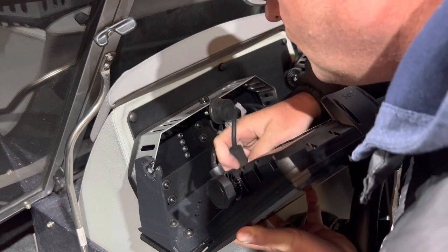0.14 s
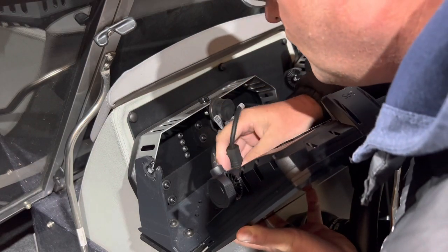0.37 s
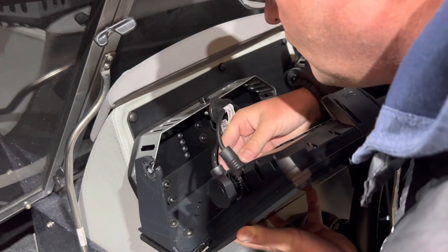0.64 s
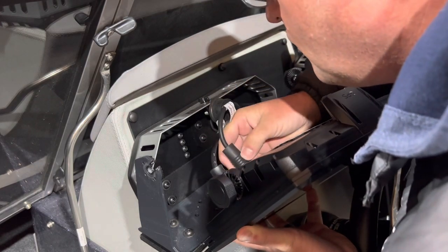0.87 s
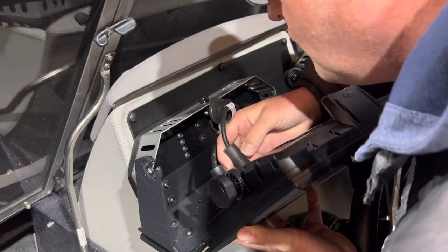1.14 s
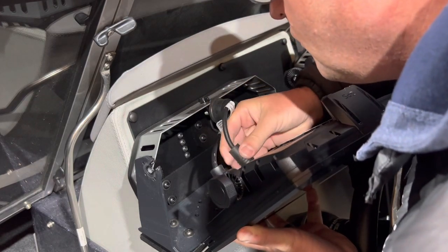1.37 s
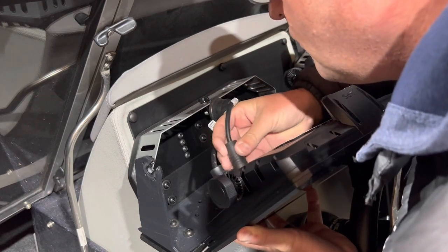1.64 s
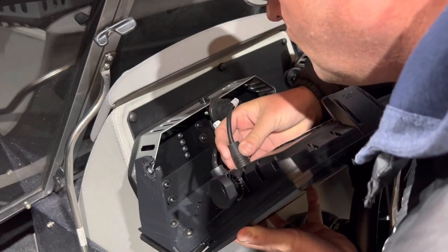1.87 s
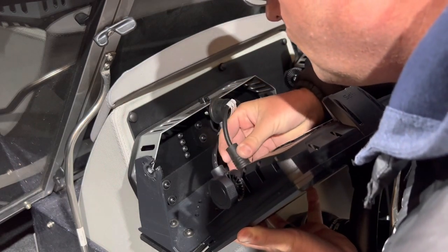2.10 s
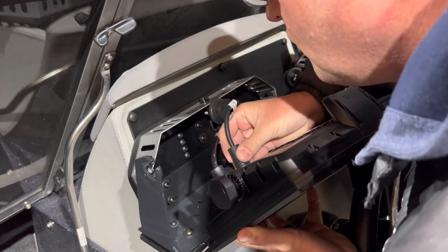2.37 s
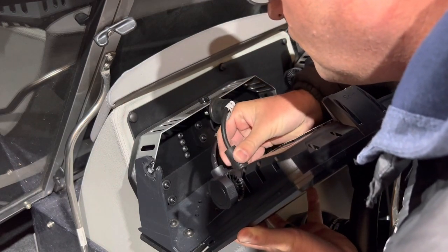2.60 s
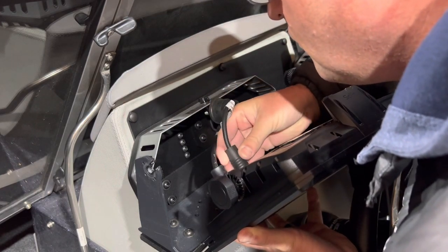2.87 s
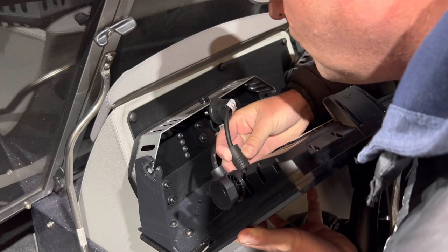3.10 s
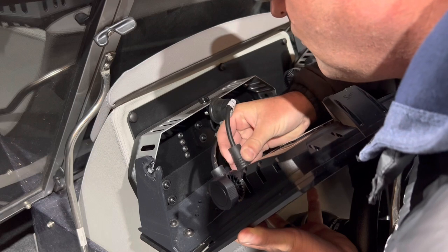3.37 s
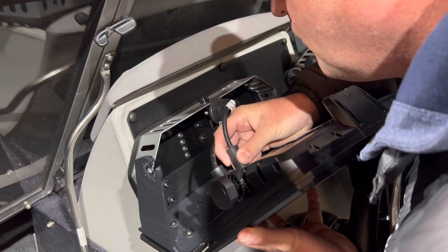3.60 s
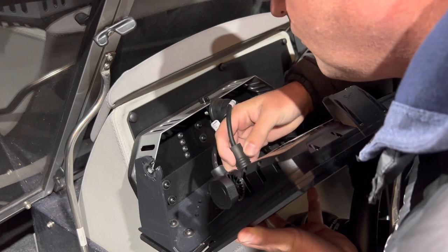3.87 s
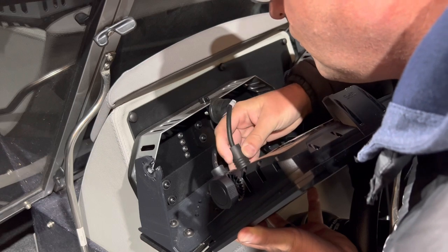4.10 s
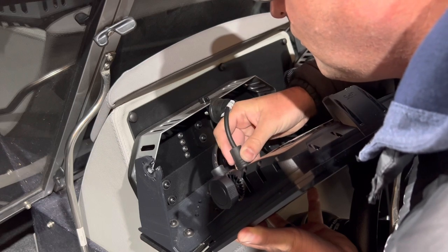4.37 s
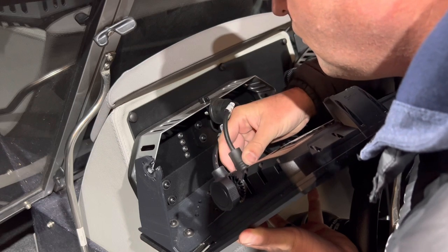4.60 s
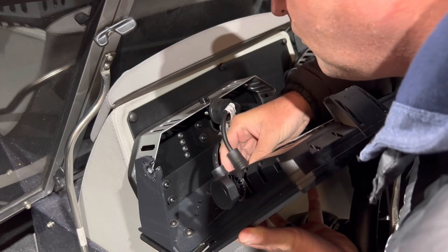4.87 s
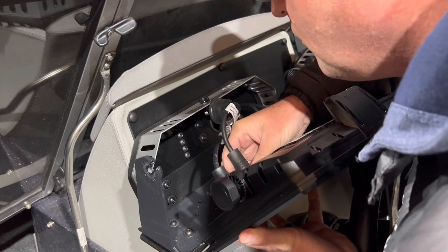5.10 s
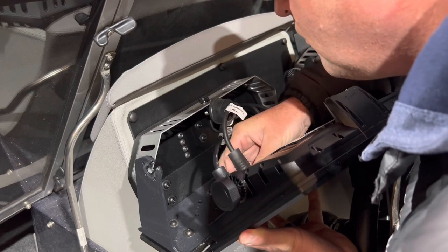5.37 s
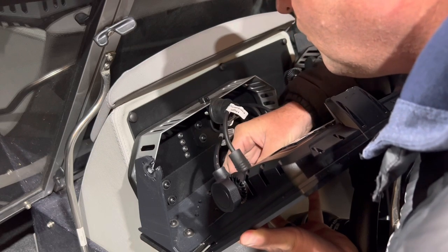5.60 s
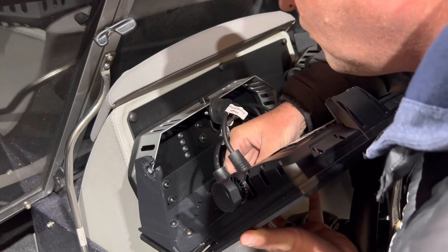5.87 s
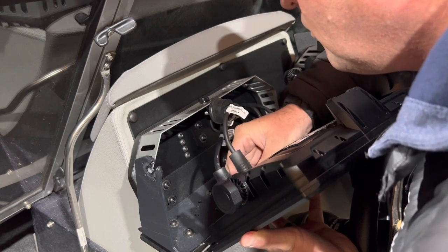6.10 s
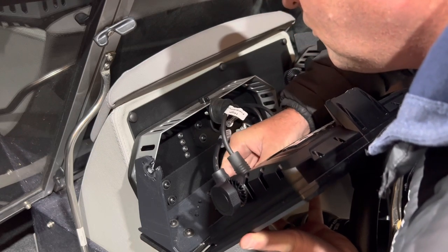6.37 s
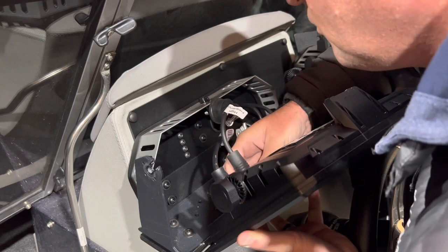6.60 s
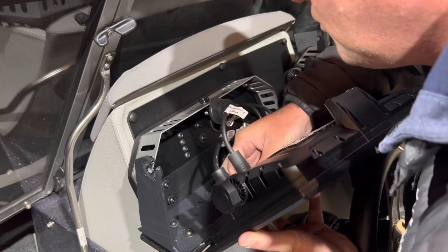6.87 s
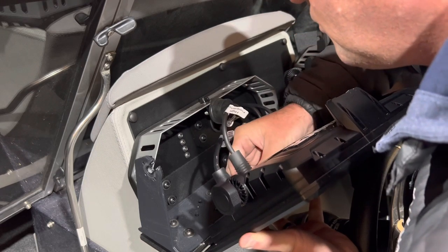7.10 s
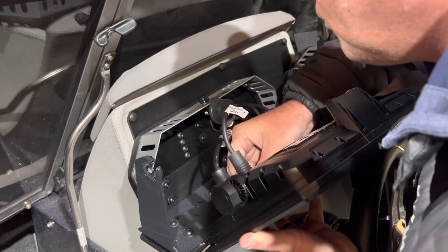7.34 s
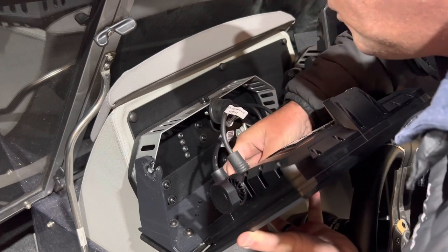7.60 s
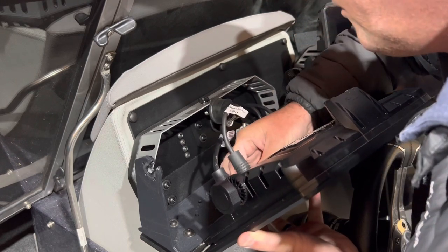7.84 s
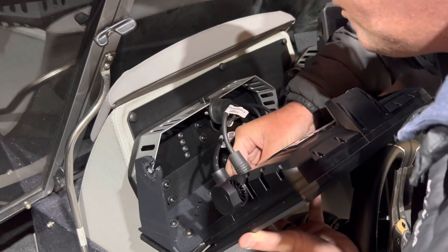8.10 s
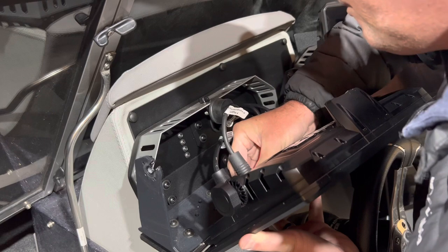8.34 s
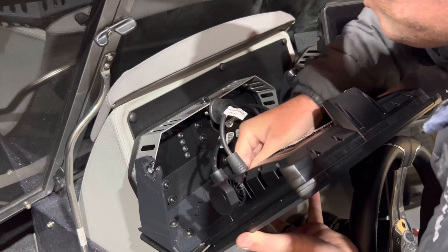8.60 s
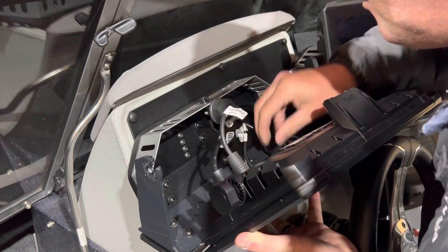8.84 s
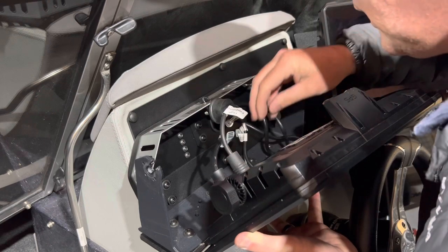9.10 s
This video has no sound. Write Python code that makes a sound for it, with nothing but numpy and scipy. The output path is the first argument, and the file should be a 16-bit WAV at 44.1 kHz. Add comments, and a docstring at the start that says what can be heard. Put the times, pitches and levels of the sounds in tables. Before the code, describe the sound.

In a small cabin, hands work connectors into the back of an equipment case. Over a faint low hum come handling rumble, cable rubs, crisp latch ticks and hollow plastic knocks, busiest in the first couple of seconds. The middle becomes sparser and softer, mostly rustle, until a loud snap and deep thud as the last plug seats. Close stereo microphone, dry with a short room tail.

```python
"""A low room hum and the rumble and rustle of restless hands run throughout: hands push connectors into
the back of an equipment case in a small cabin, close to a two-port microphone. Filtered noise makes the hum,
sleeves and cables; slips of the grip excite case modes. Latches tick as noise cracks with a brief ring, plugs
knock the case into modal ringing and clatter, and pushed panels boom as decaying sines. Near the end the last
plug seats with a thud of several panels. Knocks and ticks get a short diffuse tail."""
import sys
import numpy as np
from scipy import signal
from scipy.fft import rfft, irfft
from scipy.io import wavfile
from scipy.ndimage import uniform_filter1d

SR = 44100
rng = np.random.default_rng(int(sys.argv[2]) if len(sys.argv) > 2 else 0)


def gain_from_decibels(decibels):
    """Convert decibel values to linear amplitude factors."""
    exponent = np.asarray(decibels, float) / 20
    return 10 ** exponent


def master(y):
    """Save y as 16-bit WAV."""
    cut = np.clip(np.atleast_2d(y).T, -1, 1)
    pcm = np.round(cut * 32767)  # scale
    wavfile.write(sys.argv[1], SR, pcm.astype(np.int16))


N = 406592  # length [samples]

# the strongest modes of the case: (frequency [Hz], relative level [dB], t60 [s])
CASE_MODES = [(219.8, 8, 0.074), (317.7, 6.5, 0.046), (465, -1, 0.058), (554, -6, 0.017),
              (722, -2.5, 0.069), (1066, -5.5, 0.072), (1640, 6.5, 0.019), (2620, -4, 0.024)]


def evened(x):
    """Normalization: scales to rms 1."""
    return x / np.sqrt(np.mean(x ** 2) + 1e-20)


def read(points, hz):
    """Interpolates a table linearly along log frequency."""
    f, value = np.transpose(points)
    return np.interp(np.log(hz + 1), np.log(f + 1), value)


def add(mix, s, sound):
    """Superposition: adds a sound to the mix at time s [s], cut off at the end."""
    part = mix[..., round(s * SR):][..., :sound.shape[-1]]
    part += sound[..., :part.shape[-1]]


def colour(x, spectrum):
    """Linear filtering: weights the spectrum along the last axis by a (frequency [Hz], gain [dB]) table."""
    hz = np.fft.rfftfreq(x.shape[-1], 1 / SR)
    return irfft(rfft(x) * gain_from_decibels(read(spectrum, hz)), x.shape[-1])


def diffuse(grain_db, per_s):
    """Partial coherence: two partly alike noises, roughened by tiny random slips that decay exponentially."""
    # diffuse sound: (frequency [Hz], left-right likeness [0 to 1])
    likeness = [(150, 0.96), (1000, 0.72), (4000, 0.54), (10000, 0.92)]
    a, b = rfft(rng.standard_normal((2, N)))
    same = np.clip(read(likeness, np.fft.rfftfreq(N, 1 / SR)), 0, 1)
    pair = irfft(np.array([a, same * a + np.sqrt(1 - same ** 2) * b]), N)
    slip_size = gain_from_decibels(grain_db * np.minimum(rng.exponential(1, N), 4))
    slips = slip_size * (rng.random(N) < per_s / SR)
    decay_s = 0.005
    roughness = signal.lfilter([1], [1, -np.exp(-1 / (decay_s * SR))], slips)
    return pair * (0.5 + roughness)


def hum():
    """Stationary noise: the room hum is diffuse noise with a mostly low spectrum."""
    # room hum: (frequency [Hz], relative level per Hz [dB])
    hum_spectrum = [(25, -2.5), (60, 2.5), (220, -13.5), (800, -32.5), (1450, -31.5), (1900, -25),
                    (2450, -38.5), (5900, -47.5), (6900, -40), (7450, -35.5), (8100, -45.5), (13200, -42),
                    (16400, -48)]
    rms_db = -59
    return gain_from_decibels(rms_db) * evened(colour(diffuse(0, 0), hum_spectrum))


def hands():
    """Amplitude modulation: gains of rumble, rub and hiss over time, from the restless hands."""
    # handling levels: (time [s], rumble through the case [dB], dull rub [dB], bright hiss [dB])
    hand_levels = [(0.0, -48.5, -71, -66), (0.25, -68, -88, -64.5), (0.7, -56, -76.5, -75.5),
                   (1.25, -51.5, -62.5, -69), (1.6, -67, -74.5, -69), (1.85, -54, -62, -69.5),
                   (2.1, -65, -78, -79), (2.5, -61.5, -71, -76.5), (2.95, -62.5, -74.5, -89),
                   (3.4, -65.5, -67, -70.5), (3.7, -63, -99, -79), (4.1, -74.5, -81, -91),
                   (4.45, -57, -75.5, -92), (5.2, -63.5, -76.5, -80), (5.85, -68.5, -77, -92),
                   (6.2, -61, -70.5, -77.5), (6.5, -50, -91, -69.5), (6.75, -75, -71.5, -88),
                   (7.05, -61.5, -69.5, -74), (7.55, -59, -70.5, -95), (7.9, -68.5, -89, -103),
                   (8.298, -70, -53.5, -67), (8.449, -42.5, -63, -62.5), (8.7, -58, -60.5, -63.5),
                   (9.035, -66.5, -68, -79), (9.082, -83.5, -95, -91), (9.22, -77.5, -85, -85)]
    s, *db = np.transpose(hand_levels)
    t = np.arange(N) / SR
    return gain_from_decibels(np.array([np.interp(t, s, column) for column in db]))


def rumble():
    """Modal excitation: small slips of the grip keep the low modes of the case murmuring."""
    t = np.arange(SR // 4) / SR
    modes = [(152, 0.15, 0.1)] + CASE_MODES[:3]
    body = sum(gain_from_decibels(db - 60 * t / t60) * np.sin(2 * np.pi * hz * t) for hz, db, t60 in modes)
    murmur = signal.oaconvolve(diffuse(1.8, 57.0), body[None], axes=1)[:, :N]
    return hands()[0] * evened(murmur)


def patchy(x, depth_db):
    """Time-varying filtering: bands some 250 Hz wide drift in level over some 150 ms."""
    z = signal.stft(x, nperseg=512)[2]
    patches = rng.standard_normal(z.shape[1:])
    patches = uniform_filter1d(patches, size=3, axis=0)   # across frequency
    patches = uniform_filter1d(patches, size=26, axis=1)  # along time
    return signal.istft(z * gain_from_decibels(depth_db * evened(patches)), nperseg=512)[1][:, :N]


def crackle():
    """Impulsive friction: sparse scrapes of cable on plastic are short noise bursts, a few of them large."""
    size = gain_from_decibels(6.5 * np.minimum(rng.exponential(1, N), 4))
    impulses = size * (rng.random(N) < 60 / SR)
    decay_s = 0.0081
    envelope = signal.lfilter([1], [1, -np.exp(-1 / (decay_s * SR))], impulses)
    bursts = envelope * rng.standard_normal(N)
    return evened(colour(bursts, [(300, -19), (900, 0.0), (2000, 5), (4500, -2.0), (8000, -43.5)]))


def rustle():
    """Friction noise: sleeve and cable strokes add power to a fluttering dull rub and bright hiss."""
    # sleeve and cable strokes: (time [s], length [s], rub level [dB], hiss level [dB])
    strokes = [(0.115, 0.088, -53.5, -54), (0.473, 0.21, -65, -66.5), (0.794, 0.014, -74, -56.5),
               (1.024, 0.037, -59, -75), (1.146, 0.07, -48.5, -58.5), (1.398, 0.15, -60.5, -66.5),
               (2.129, 0.034, -60, -78), (2.947, 0.18, -69.5, -80), (3.478, 0.092, -61.5, -70),
               (4.276, 0.097, -59.5, -88), (5.366, 0.091, -64.5, -70.5), (5.956, 0.14, -66, -67),
               (6.135, 0.03, -64.5, -74), (6.202, 0.17, -62, -69.5), (6.411, 0.24, -57.5, -71),
               (6.995, 0.048, -59, -79), (7.068, 0.05, -61, -75), (7.168, .12, -65.5, -70),
               (7.439, 0.25, -58, -59.5), (7.703, 0.11, -63.5, -65), (7.994, 0.16, -61, -64),
               (8.167, 0.12, -78, -59.5), (8.547, 0.12, -56.5, -59), (9.175, 0.057, -76, -71.5)]
    # dull rub: (frequency [Hz], relative level per Hz [dB])
    rub_spectrum = [(250, -11.5), (450, -6.5), (750, -15.5), (1060, -9), (1450, -10.5), (2200, -16),
                    (3000, -19.5), (5000, -24), (8000, -64)]
    # bright hiss: (frequency [Hz], relative level per Hz [dB])
    hiss_spectrum = [(1500, -16), (3000, -12.5), (6000, -20), (8000, -18), (13000, -19.5), (16400, -30)]
    flutter_db, flutter_s = 1.3, 0.05  # the hands never move evenly
    width = round(flutter_s * SR)
    flutter = uniform_filter1d(rng.standard_normal(N), width)
    flutter = evened(uniform_filter1d(flutter, width))
    power = (hands()[1:] * gain_from_decibels(flutter_db * flutter)) ** 2

    margin_s = 0.02  # each swell reaches this far beyond both ends of its stroke
    for s, length, *db in strokes:
        swell = signal.windows.tukey(round((length + 2 * margin_s) * SR), 0.75)
        add(power, s - margin_s, (gain_from_decibels(np.array(db))[:, None] * swell) ** 2)
    rub_gain, hiss_gain = np.sqrt(power)

    rub = evened(patchy(colour(diffuse(2.6, 400), rub_spectrum), 3.5))
    hiss = evened(colour(diffuse(1.8, 450), hiss_spectrum))
    return rub_gain * (rub + gain_from_decibels(-14.5) * crackle()) + hiss_gain * hiss


def tick(level_db, dull_db):
    """Transient and resonance: a bright and dull noise crack decays fast, then faintly rattles and rings."""
    # bright part: (frequency [Hz], relative level per Hz [dB])
    snap_spectrum = [(2500, -11.5), (4500, -8.5), (8500, 13), (15000, 0.5), (16400, -23.5)]
    # small metal parts of a latch: nominal frequency [Hz]
    latch_hz = np.array([3150, 4450, 5100])
    latch_t60_s = 0.025
    t = np.arange(4096) / SR - 0.005  # the crack peaks at t = 0
    onset = np.exp(np.minimum(t, 0) / 0.00035)
    shape = onset * (np.exp(-abs(t) / 0.0032) + 0.25 * np.exp(-abs(t) / 0.0081))

    bright, dull = rng.standard_normal((2, len(t)))
    dull = colour(dull, [(1200, -53.0), (2200, -5.5), (5500, -7.5), (7000, -21)])
    bright = colour(bright, [(8500, 0.54 * min(dull_db, 0)), (12500, 0.0068)])  # thin ticks sit higher
    crack = shape * (evened(colour(bright, snap_spectrum)) + gain_from_decibels(dull_db) * evened(dull))

    after = np.maximum(t, 0)
    tuned_hz = latch_hz[:, None] * gain_from_decibels(rng.standard_normal())  # each tick is tuned a little differently
    ring = gain_from_decibels(3.5 * rng.standard_normal(len(latch_hz))) @ np.sin(2 * np.pi * tuned_hz * after)
    ring_gain = gain_from_decibels(dull_db - 10.5 - 60 * after / latch_t60_s)
    return gain_from_decibels(level_db) * (crack + ring_gain * ring)


def knock(level_db, low_db, high_db):
    """Modal synthesis: a contact rings the strong case modes; its dense weak modes are dying noise bands."""
    t = np.arange(8192) / SR
    contact_s = 0.0015
    bands = np.geomspace(200, 6400, num=11)
    weak_modes = np.transpose([bands, -2.5 + 0 * bands, 0.058 * (bands / 1000) ** -0.6])
    hz, db, t60 = np.vstack([CASE_MODES, weak_modes]).T[:, :, None]
    strong = len(CASE_MODES)

    spot_db = 1.6 * rng.standard_normal((len(hz), 1))  # each knock weights the modes differently
    tilt_db = [low_db, 0, 0, high_db, high_db - 13.5]
    db = db + np.interp(np.log(hz), np.log([300, 480, 900, 2900, 6400]), tilt_db) + spot_db

    octaves = np.log2((np.fft.rfftfreq(len(t), 1 / SR) + 1) / bands[:, None])
    noise = rng.standard_normal((len(bands), len(t)))
    clatter = irfft(rfft(noise) * np.exp(-(octaves / 0.3) ** 2))
    swing = np.vstack([np.sin(2 * np.pi * hz[:strong] * t), clatter])

    held = np.maximum(t - contact_s, 0)  # the ring dies once the contact ends
    shape = gain_from_decibels(-60 * held / t60)
    shape[strong:] += gain_from_decibels(-7.0 - 60 * held / (1.2 * t60[strong:]))  # loose parts buzz on faintly
    shape *= 1 - np.exp(-t / (0.0011 + 0.48 / hz))  # low modes take longer to build up
    sound = shape * swing
    # every mode gets the energy of its envelope
    sound *= np.linalg.norm(shape, axis=1, keepdims=True) / np.linalg.norm(sound, axis=1, keepdims=True)
    return gain_from_decibels(level_db - 11.5) * (gain_from_decibels(db) * sound).sum(0)


def cabin(x):
    """Diffuse reverberation: convolves with a short noise tail whose bands decay at their own speeds."""
    # cabin tail: (frequency [Hz], t60 [s])
    decay = [(200, 0.25), (1000, 0.24), (4000, 0.33), (9000, 0.15)]
    hz, t, z = signal.stft(diffuse(0, 0)[:, :SR // 2], SR, nperseg=256)
    fade = gain_from_decibels(-60 * t / read(decay, hz)[:, None])
    tail = signal.istft(z * fade, SR, nperseg=256)[1]
    tail[:, :200] = 0  # a gap ahead of the tail
    return signal.fftconvolve(x, tail / np.linalg.norm(tail[0]), axes=1)[:, :N]


def boom(peak_db, hz, t60):
    """Damped oscillation: a panel swells quickly and swings out, its envelope peaking at peak_db."""
    t = np.arange(SR) / SR
    swing = (1 - np.exp(-t * hz / 0.53)) * gain_from_decibels(-60 * t / t60)
    return gain_from_decibels(peak_db) * swing / swing.max() * np.sin(2 * np.pi * hz * t)


def thud():
    """Superposed damped oscillations: the last plug seats and swings several panels, low ones later."""
    # panels in the thud: (frequency [Hz], envelope peak [dB], t60 [s])
    panels = [(223, -22.5, 0.15), (133.6, -23.5, 0.15), (86, -24, 0.18), (55, -20, 0.37), (98.6, -40, 1.6)]
    start_s, lag_cycles = 8.392, 1.76  # a heavier, lower panel starts to move later
    sound = np.zeros(N)
    for hz, peak_db, t60 in panels:
        add(sound, start_s + lag_cycles / hz, boom(peak_db, hz, t60))
    return sound


def scene():
    """Superposition: ticks and knocks with the cabin's tail, booms and thud, over handling noise and hum."""
    # latch and pin ticks: (time [s], level [dB], dull part relative to bright [dB])
    ticks = [(0.0222, -55, -5), (0.1303, -52.5, 16), (0.17, -46, 0.5), (0.2652, -47, -12),
             (0.408, -59.5, 1), (0.446, -51.5, 3), (0.455, -51, -5), (0.5203, -51.5, -21),
             (0.612, -61.5, 4.5), (0.803, -55, 0.5), (1.0296, -36.5, -5.5), (1.126, -57.5, 10),
             (1.2045, -48, 6), (1.26, -52, -12), (1.2998, -39, -20), (1.9684, -44.5, -2.5),
             (2.187, -46.5, 8), (2.5334, -49.5, -9), (2.553, -46.5, -21), (2.602, -56, -13),
             (3.3336, -49.5, -12), (3.5347, -59.5, 4), (3.707, -49.5, -20), (3.922, -63, -34),
             (3.9421, -44.5, -14), (4.054, -56, -18), (4.063, -62, -14), (4.183, -62.5, -10),
             (4.2552, -50, -5), (4.2782, -46, -9), (4.3124, -65, 13.5), (4.338, -57.5, -6),
             (4.4912, -38.5, -13.5), (4.541, -56, -27), (4.592, -55.5, -12), (4.8778, -59.5, 4),
             (5.1458, -54, -8), (5.5463, -56.5, -10), (5.599, -67.5, -2), (5.9883, -62.5, 5.5),
             (7.311, -72, 16), (7.544, -57, 9), (8.266, -61, 13), (8.3779, -28.5, 6), (8.4212, -51.5, 9.5),
             (8.6646, -61, 10.5), (8.874, -87, 15.5)]
    # plug against case: (time [s], level before a common trim [dB], low-mode tilt [dB], high-mode tilt [dB])
    knocks = [(0.073, -35, -1, -18), (0.139, -48, 13.5, -27), (0.155, -35.5, 2.5, -6), (0.18, -41, -1, -11),
              (0.541, -28.5, -3, -25), (0.798, -43, -4.5, -14), (1.028, -36, -8, -35),
              (1.122, -34.5, -11, -20), (1.19, -26.5, -1, -21), (1.222, -28.5, -29, -6.5),
              (1.594, -50.5, 7.5, -1.5), (1.671, -22, -4.5, -15), (1.907, -40, 1, -12),
              (1.965, -41, -11, -13), (2.178, -28, -18, -4), (2.193, -26.5, 0.5, -9),
              (2.267, -26.5, -2, -9.5), (2.914, -52, 9, -30), (4.255, -26, 3.5, -1.5),
              (4.593, -49.5, 10, -11), (4.866, -54, 4, -15), (5.126, -47.5, 3.5, -37),
              (5.425, -51.5, 3, -31), (5.685, -67.5, 25.5, -29), (5.738, -55.5, 19, -16),
              (5.99, -42.5, 10, -19), (6.275, -47, 1.5, -4), (6.5, -40.5, -12, 4), (6.901, -69, 20.5, -11),
              (6.948, -58, 10, 4.5), (7.313, -48, 7.5, 1), (7.54, -43, 2, -1), (8.133, -58.5, 14.5, -19),
              (8.265, -33, -2, 0.5), (8.3773, -7.5, -19, -15)]
    # soft pushes that set a panel swinging: (time [s], envelope peak [dB], frequency [Hz])
    booms = [(0.567, -41, 152), (0.819, -39.5, 152), (1.288, -49.5, 152), (1.62, -43, 58), (1.91, -58, 152),
             (4.001, -47, 152), (4.024, -47.5, 55), (4.602, -43.5, 206.6), (4.881, -48, 152),
             (2.191, -40.5, 124.3), (2.959, -52, 286), (5.741, -47.5, 62), (6.441, -47.5, 91),
             (6.561, -43.5, 124.7), (6.62, -39.5, 57), (7.181, -51, 60.3)]
    boom_t60_s = 0.33
    steady = hum() + rumble() + rustle()
    hits = np.zeros((2, N))
    for s, *row in ticks:
        add(hits, s - 0.005, tick(*row))  # a tick peaks 5 ms after its start
    for s, *row in knocks:
        add(hits, s, knock(*row))
    hits += gain_from_decibels(-14.5) * cabin(hits)
    for s, peak_db, hz in booms:
        add(hits, s, boom(peak_db, hz, boom_t60_s))
    return hits + thud() + steady


def low_pass(x):
    """Removes everything above the highest recorded frequency."""
    return signal.sosfilt(signal.butter(12, 16610, fs=SR, output="sos"), x)


def record(dry):
    """Interchannel phase and level: the ports differ by frequency; a high-pass cuts the deepest bass."""
    # between the ports: (frequency [Hz], phase by which left leads [rad])
    phase_lead = [(100, .05), (800, .45), (3100, 1), (5200, .9), (6900, 0), (8100, -1), (9300, -2.9),
                  (10900, -3.4), (12500, -5.6), (14400, -6.6), (16200, -9)]
    # between the ports: (frequency [Hz], left over right [dB])
    left_excess = [(600, 0), (4000, 2), (8000, .2)]
    hz = np.fft.rfftfreq(N, 1 / SR)
    # each port takes half of the difference
    left = np.exp(0.5j * read(phase_lead, hz)) * gain_from_decibels(read(left_excess, hz) / 2)
    bass_cut = hz ** 4 / (hz ** 4 + 28.6 ** 4)
    mix = irfft(rfft(dry) * np.array([left, 1 / left]) * bass_cut, N)
    return low_pass(mix)


dry = scene()
out = record(dry)
master(out)
```